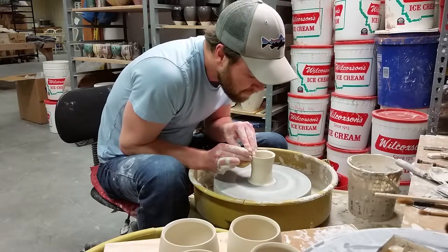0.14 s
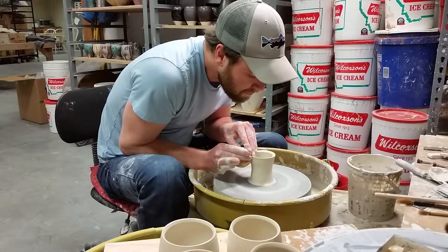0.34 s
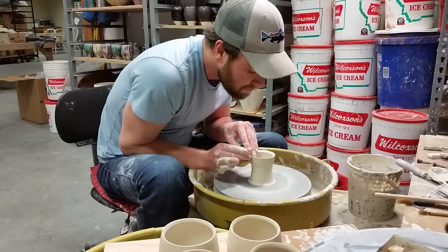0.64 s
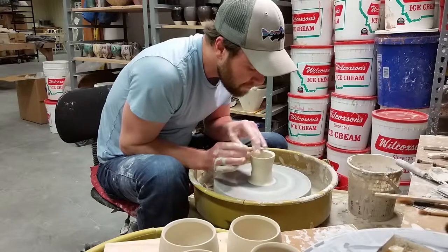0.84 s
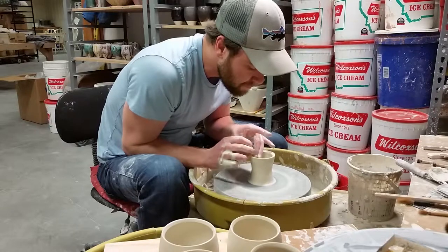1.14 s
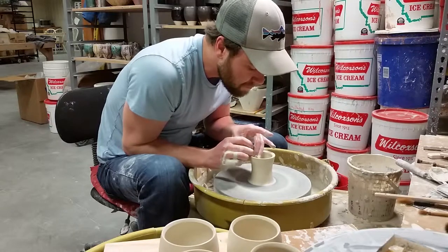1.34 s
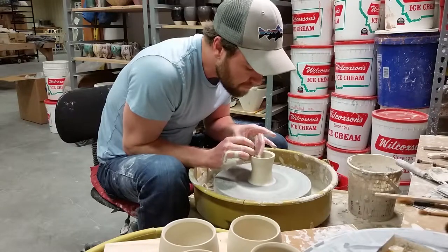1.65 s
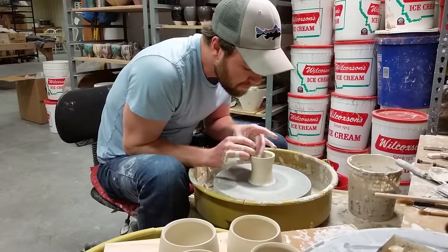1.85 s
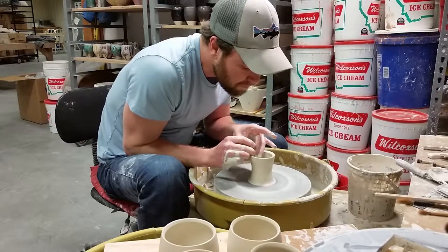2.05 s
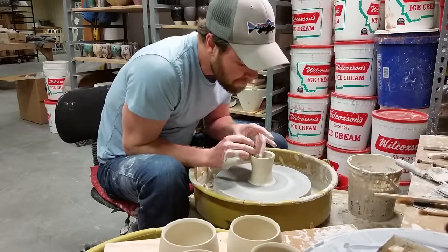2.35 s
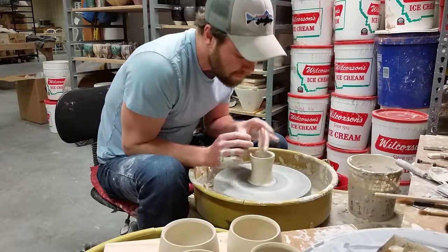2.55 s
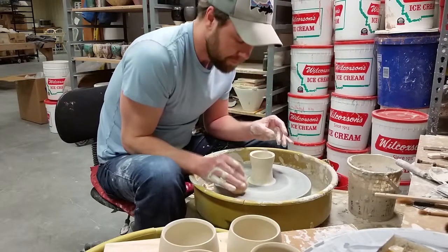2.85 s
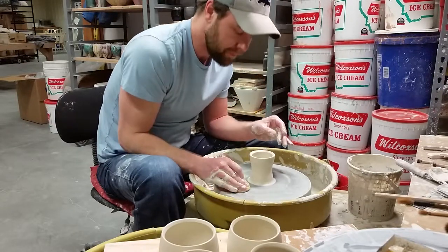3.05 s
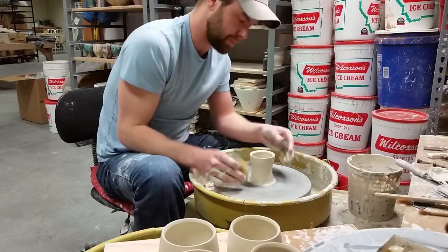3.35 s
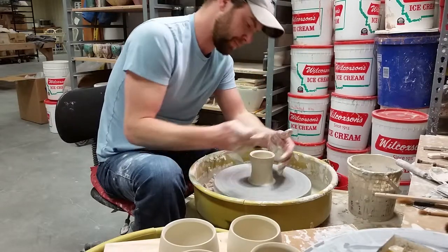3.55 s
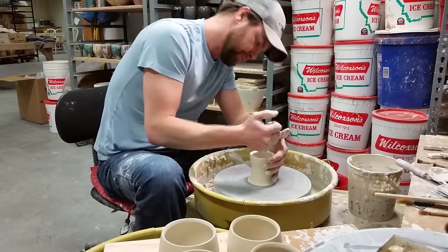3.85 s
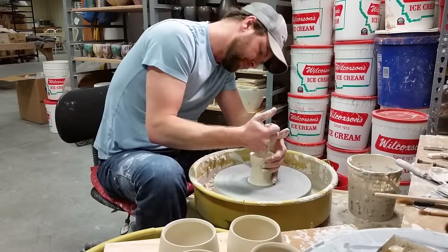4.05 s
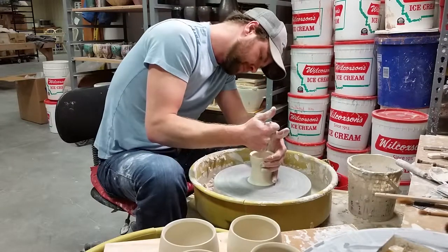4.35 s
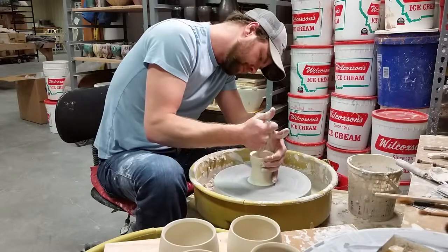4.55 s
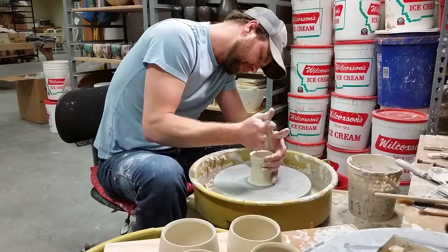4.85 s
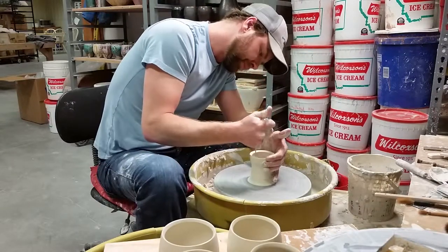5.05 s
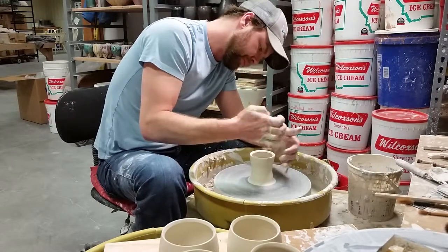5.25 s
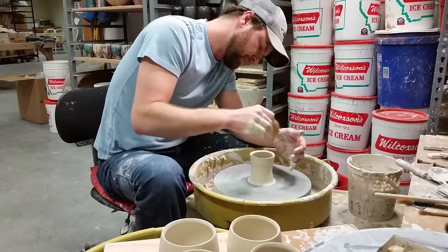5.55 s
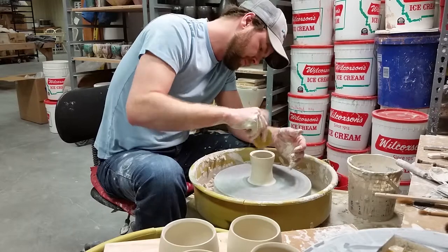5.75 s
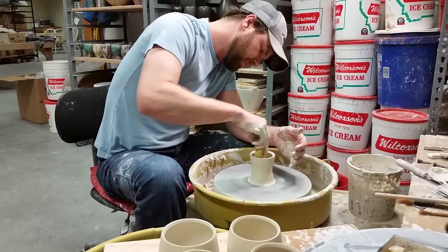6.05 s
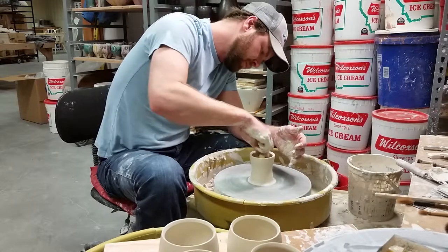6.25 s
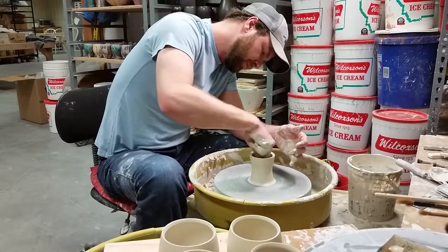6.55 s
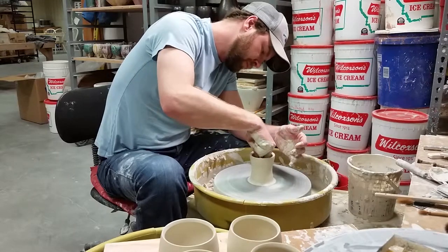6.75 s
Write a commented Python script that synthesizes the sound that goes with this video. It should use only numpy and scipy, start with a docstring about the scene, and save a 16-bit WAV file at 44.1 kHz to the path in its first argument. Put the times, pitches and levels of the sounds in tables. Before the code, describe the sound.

A quiet, close stereo view of an electric potter's wheel running without pause indoors. From 0 to about 3 seconds the motor holds a deep hum around 150 hertz, gently swelling and dipping, with a softer whine near 380 hertz, low frame rumble, rushing air and a thin brush hiss around 2 to 5 kilohertz toward the right. Slow wavering follows the wheel's turning. At about 3.0 to 3.5 wet fingers make faint, grainy slides; a tiny smack comes at 3.8. A thin high singing tone emerges by 3.6. Around 4.1 a dull rub accompanies the hands' load: pitch sags slightly until about 5, the whine fades and partly returns weaker, and the hum breaks into irregular rounded throbs. A small wet smack ticks at 5.2, the airy hiss softens from about 5.5, and a brief dull rub lands at 6.0. Throbbing continues to the end near 6.9.

```python
"""In a pottery studio an electric wheel runs while a small cup is thrown.
The motor hums, whines and sings on multiples of its shaft rate; belt and bearings make the frame rumble.
Filtered noise gives the rushing air and the brushes' hiss to the right. As the hands load the clay the shaft
slows a little and the hum breaks into throbs. Wet fingers are shaped noise: grainy slides, dull rubs
and small smacks. A faint high hiss lies over it all."""
import sys
import numpy as np
from scipy import signal
from scipy.fft import rfft, irfft
from scipy.io import wavfile

SR = 44100
rng = np.random.default_rng(int(sys.argv[2]) if len(sys.argv) > 2 else 0)


def to_wav(sig):
    """Store sig (one row per channel, or 1-D mono) as 16-bit WAV at the path in sys.argv[1].

    Samples outside -1..1 are clipped; the rate is SR.
    """
    pcm = np.clip(np.atleast_2d(sig), -1, 1) * 32767
    pcm = np.round(pcm).astype(np.int16)
    wavfile.write(sys.argv[1], SR, pcm.T)  # frames by channels


N = 304716
TIME = np.arange(N) / SR  # s
BINS = np.maximum(np.arange(N // 2 + 1) * SR / N, 1)  # Hz, kept above zero for the logarithms

# Speed of the motor shaft. Each row: time in seconds, speed in turns per second.
SHAFT_SPEED = [(0, 25.56), (0.4, 25.5), (0.9, 25.55), (1.5, 25.44), (2.2, 25.46), (2.8, 25.38),
               (3.4, 25.47), (3.8, 25.26), (4.1, 25.12), (4.3, 24.88), (4.5, 24.57), (4.8, 24.36),
               (5.2, 24.29), (5.6, 24.3), (6, 24.27), (6.4, 24.29), (6.9, 24.39)]
# The hum's level before its trim and the load's pull. Each row: time in seconds, level in dB.
HUM_CURVE = [(0.0, -48.5), (0.11, -46), (0.49, -53.5), (0.51, -50.5), (1.1, -47), (1.27, -51),
             (1.82, -47.5), (1.93, -55.5), (1.98, -50), (3.48, -46), (4.0, -45.5)]
# Throbs that stand out of the hum under load. Each row: crest in seconds, half length in seconds, level in dB.
HUM_THROBS = [(4.097, 0.067, -46), (4.286, .04, -51.5), (4.418, 0.074, -46.5), (4.586, 0.06, -47),
              (4.841, 0.14, -45.5), (5.142, 0.077, -45.5), (5.323, 0.065, -54), (5.65, 0.06, -47),
              (5.923, 0.14, -45), (6.16, 0.05, -50), (6.414, 0.092, -48), (6.704, 0.073, -45.5),
              (6.89, 0.065, -50.5)]
# Deep partials of the hum. Each row: multiple of the shaft rate, level running free in dB,
# level under load in dB, left over right in dB.
HUM_TONES = [(4, -13, -22.5, -1.5), (6, 1.5, -0.56, -2.5), (7, -13.5, -22.5, 5), (8, -20, -27, 4.5)]
# Partials of the housing's whine. Each row: multiple of the shaft rate, level running free in dB,
# level under load in dB, left over right in dB.
WHINE_TONES = [(11, -13, -24.5, -4), (12, -14.5, -19.5, -0.5), (13, -18, -10.5, -11),
               (14, -8.5, -15.5, -12.5), (15, 2.5, 2, 0), (16, -12, -7, -5.5)]
# Level of the commutator's thin singing. Each row: time in seconds, level in dB.
SINGING_CURVE = [(0, -90), (2.4, -93), (3.6, -77), (6.91, -77.5)]
# Partials of that singing. Each row: multiple of the shaft rate, level running free in dB,
# level under load in dB, left over right in dB.
SINGING_TONES = [(32, -10, -9, -8), (43, -12, -8.5, -2.5), (47, -15.5, -8.5, -8.5), (48, 0.5, -1, -11.5)]
# Resonances of frame and splash pan. Each row: frequency in Hz, width in Hz before narrowing, level in dB.
FRAME_RESONANCES = [(55, 9, -13), (114.4, 10, 0.5), (136.8, 7.7, 2.5), (143.6, 7.2, -1.5), (181, 15, -6),
                    (293, 9.2, -8.5), (337.5, 14, -6.5), (496, 15, -21), (1021, 18, -19)]
# Shared level of brushes, air and high hiss, before their offsets. Each row: time in seconds, level in dB.
NOISE_CURVE = [(0.06, -63), (0.51, -65.5), (0.7, -64), (1.86, -64.5), (3.41, -64), (4.62, -64),
               (4.67, -66.5), (4.92, -64.5), (5.47, -68), (6.0, -68), (6.23, -70), (6.47, -66.5),
               (6.56, -68), (6.85, -66.5)]
# Spectrum of the rushing air. Each row: frequency in Hz, density in dB per Hz.
AIR_SPECTRUM = [(25, -9.5), (60, -3.5), (100, 5), (240, 3), (430, -0.5), (600, -2), (900, -7.5),
                (1150, -10.5), (1400, -17.5), (1800, -22.5), (3000, -21), (6000, -45)]
# Spectrum of the scraping brushes. Each row: frequency in Hz, density in dB per Hz.
BRUSH_SPECTRUM = [(1650, -44), (1900, -16.5), (2150, -6.5), (2380, -9.5), (2680, -30), (2950, -23),
                  (3150, -20), (3500, -2), (4250, 1.5), (4650, -7.5), (5050, -12), (6100, -33), (8000, -42),
                  (11000, -50)]
# Wet fingers sliding on wheel head and clay. Each row: start in seconds, rise in seconds, peak in dB,
# brightness as a corner in Hz.
FINGER_SLIDES = [(2.98, 0.27, -74.5, 18000), (3.23, 0.12, -71, 15000), (3.52, .15, -84.5, 20000),
                 (4.0, 0.2, -81.5, 10000)]
# Spectrum of slip under the fingers. Each row: frequency in Hz, density in dB per Hz.
SLIP_SPECTRUM = [(1200, -4.5), (1800, 5), (2900, -5), (5700, 3.5), (6900, -4.5), (8100, -1.5), (9800, -9.5),
                 (11500, 2.5), (12600, 2), (14000, 1), (16000, -2.5)]
# Hands and sponge pressing on the pot. Each row: crest in seconds, half length in seconds, level in dB.
HAND_RUBS = [(4.145, .3, -68.5), (6.0, 0.048, -66.5)]
# Spectrum of the dull rub. Each row: frequency in Hz, density in dB per Hz.
RUB_SPECTRUM = [(200, -3.5), (600, 0), (1100, -11), (2000, -23.5)]
# Fingers touching or leaving the wet clay. Each row: start in seconds, level in dB, decay in seconds.
FINGER_SMACKS = [(3.805, -77, 0.063), (4.095, -82, .025), (5.219, -71, 0.018), (5.23, -81, 0.11)]
# Spectrum of a smack. Each row: frequency in Hz, density in dB per Hz.
SMACK_SPECTRUM = [(4000, -23), (7000, -17), (10500, -15), (12500, 1), (14200, -1.5), (15500, -10)]
# Spectrum of the faint high hiss. Each row: frequency in Hz, density in dB per Hz.
HIGH_HISS_SPECTRUM = [(3000, -9.5), (7000, -16.5), (9700, -14), (10800, -8), (12200, 1.5), (14000, 0),
                      (16000, 0)]

WHEEL_RATIO = 8.2  # motor turns per turn of the wheel head
FREE_SPEED, FULL_SAG = 25.45, 0.93  # turns per s: unloaded speed, and the slowing that counts as full load
HUM_TRIM_DB, LOAD_SINKS_HUM_DB = -1.43, 7.5
WHINE_FREE_DB, WHINE_LOADED_DB = -55, -62.5
WHINE_FOLLOWS = 0.33  # share of the hum's swing in dB
# the whine fades as the shaft passes through one speed
QUIET_SPEED, QUIET_WIDTH = 24.75, 0.22  # turns per s
QUIET_DEPTH_DB = 16
RUMBLE_DB = -59
BRUSH_DB, LOW_AIR_DB, HIGH_AIR_DB, HIGH_HISS_DB = 0.34, -0.46, -2, -17  # relative to NOISE_CURVE
SLIDE_RELEASE_S = 0.19
LEFT_LAG_S = 0.00025  # the wheel stands a little to the right
CONVERTER_OFFSET = -0.0005
CUTOFF_HZ = 15700


def from_db(db):
    """Decibels to gain."""
    return 10 ** (np.asarray(db) / 20)


def rms_one(x):
    """Scale to unit power."""
    return x / np.sqrt(np.mean(x ** 2) + 1e-20)


def in_time(rows):
    """Each column of a curve at every sample."""
    s, *columns = np.transpose(rows)
    return [np.interp(TIME, s, column) for column in columns]


def colour(points):
    """Gain of a spectrum at every frequency bin, falling steeply past its ends."""
    hz, db = np.transpose(points)
    ends = np.minimum(1, np.minimum(BINS / hz[0], hz[-1] / BINS)) ** 4
    return from_db(np.interp(np.log(BINS), np.log(hz), db)) * ends


def place(pan_db):
    """Left and right gains with a mean of one; a negative pan leans right."""
    gains = from_db([[pan_db / 2], [-pan_db / 2]])
    return gains / gains.mean()


def drift(rate):
    """Slow chance with a spread of one, fading out above the rate in Hz."""
    lowpass = 1 / (1 + (BINS / rate) ** 2) ** 2
    return rms_one(irfft(rfft(rng.standard_normal(N)) * lowpass, N))


def noise(gain, alike, pan_db):
    """Coloured stereo noise, partly shared by the two sides; its middle has unit power."""
    mid, side = irfft(rfft(rng.standard_normal((2, N))) * gain, N)
    shared = np.sqrt(1 + alike) * mid
    apart = np.sqrt(1 - alike) * side * [[1], [-1]]
    pair = (shared + apart) * place(pan_db)
    return pair / pair.mean(axis=0).std()


def partials(table, angle, load, sway_db, flutter_db, scatter):
    """Multiples of the shaft rate; the weak ones sway most with each turn of the wheel head."""
    out = 0
    for multiple, free_db, loaded_db, pan_db in table:
        level_db = free_db + load * (loaded_db - free_db)
        weakness = 1 - from_db(free_db)
        sway = sway_db * weakness * np.sin(angle / WHEEL_RATIO + rng.uniform(0, 2 * np.pi))
        flutter = flutter_db * (0.5 + weakness) * drift(24)
        start_phase = scatter * rng.standard_normal()
        wave = np.sqrt(2) * np.cos(multiple * angle + start_phase)
        out = out + from_db(level_db + sway + flutter) * wave * place(pan_db)
    return out


def motor_tones(angle, speed, load):
    """Hum, whine and singing from one shaft; the whine shares part of the free hum's swells."""
    hum_db, = in_time(HUM_CURVE)
    swing_db = hum_db - hum_db.mean()
    return hum(angle, load, hum_db) + whine(angle, speed, load, swing_db) + singing(angle, load)


def hum(angle, load, hum_db):
    """The frame's deep hum sinks under load, where round throbs stand out of it."""
    steady = from_db(hum_db + HUM_TRIM_DB - LOAD_SINKS_HUM_DB * load)
    throbs = sum(from_db(db) * np.exp(-np.abs((TIME - s) / half) ** 3) for s, half, db in HUM_THROBS)
    tones = partials(HUM_TONES, angle, load, sway_db=1.5, flutter_db=0.65, scatter=1.0)
    return np.hypot(steady, throbs) * tones


def whine(angle, speed, load, swing_db):
    """The housing's whine sinks under load; its partials start nearly in step and purr once per shaft turn."""
    quiet = np.exp(-((speed - QUIET_SPEED) / QUIET_WIDTH) ** 4)
    level_db = WHINE_FREE_DB + load ** 2 * (WHINE_LOADED_DB - WHINE_FREE_DB)
    level_db = level_db - QUIET_DEPTH_DB * quiet + WHINE_FOLLOWS * swing_db
    tones = partials(WHINE_TONES, angle, load, sway_db=1.3, flutter_db=0.9, scatter=0.12)
    return from_db(level_db) * tones


def singing(angle, load):
    """The commutator's thin tones waver slightly because chance nudges the shaft angle they follow."""
    level_db, = in_time(SINGING_CURVE)
    waver = 0.0063 * drift(11)  # radians of shaft angle
    tones = partials(SINGING_TONES, angle + waver, load, sway_db=1.5, flutter_db=2.5, scatter=1.0)
    return from_db(level_db) * tones


def frame_rumble(angle):
    """Belt and bearings shake the frame's modes, harder once per turn of the wheel head."""
    power = 0
    for hz, width, db in FRAME_RESONANCES:
        detune = (BINS - hz) / (0.73 * width)  # each mode rings narrower than its listed width
        power = power + from_db(2 * db) / (1 + detune ** 2) ** 2
    level_db = RUMBLE_DB + 2.0 * np.sin(angle / WHEEL_RATIO)
    return from_db(level_db) * noise(np.sqrt(power), alike=0.89, pan_db=-2.5)


def air_and_brushes(angle, noise_db):
    """Air rushes through the motor; the brushes scrape, a little harder once per shaft turn."""
    deep = 1 / (1 + (BINS / 380) ** 4)  # long waves reach both sides more alike
    air = colour(AIR_SPECTRUM)
    low_air = from_db(noise_db + LOW_AIR_DB) * noise(air * np.sqrt(deep), alike=0.29, pan_db=-9.5)
    high_air = from_db(noise_db + HIGH_AIR_DB) * noise(air * np.sqrt(1 - deep), alike=0.089, pan_db=-5.5)
    scrape_db = noise_db + BRUSH_DB + 0.14 * np.cos(angle) + 0.51 * drift(40)
    brushes = from_db(scrape_db) * noise(colour(BRUSH_SPECTRUM), alike=0.02, pan_db=-21.0)
    return low_air + high_air + brushes


def wet_hands():
    """All that the hands do on the wet clay: slides, rubs and smacks."""
    return finger_slides() + hand_rubs() + finger_smacks()


def finger_slides():
    """Slip under the fingers hisses; fast chance in its level makes it grainy."""
    slides = 0
    for s, rise, db, corner_hz in FINGER_SLIDES:
        age = np.maximum(TIME - s, 0)
        release = np.exp(-np.maximum(age - rise, 0) / SLIDE_RELEASE_S)
        stroke = np.sqrt(np.minimum(age / rise, 1)) * release
        dulling = 1 / np.sqrt(1 + (BINS / corner_hz) ** 6)
        slip = noise(colour(SLIP_SPECTRUM) * dulling, alike=0.04, pan_db=-4.5)
        slides = slides + from_db(db + 1.85 * drift(120)) * stroke * slip
    return slides


def hand_rubs():
    """Pressing on the pot swells and fades as a dull, rounded burst of low noise."""
    press = sum(from_db(db) * np.exp(-((TIME - s) / half) ** 2) for s, half, db in HAND_RUBS)
    return press * noise(colour(RUB_SPECTRUM), alike=0.3, pan_db=-5)


def finger_smacks():
    """Fingers meeting or leaving wet clay give a bright burst that starts fast and dies away."""
    burst = 0
    for s, db, decay in FINGER_SMACKS:
        age = np.maximum(TIME - s, 0)
        attack = np.minimum(age / 0.004, 1)
        burst = burst + from_db(db) * attack * np.exp(-age / decay)
    return burst * noise(colour(SMACK_SPECTRUM), alike=0.05, pan_db=3)


def high_hiss(noise_db):
    """A faint wide hiss of treble noise follows the level of the brushes."""
    hiss = noise(colour(HIGH_HISS_SPECTRUM), alike=0.02, pan_db=3.5)
    return from_db(noise_db + HIGH_HISS_DB) * hiss


def scene():
    """One shaft drives the wheel's tones and pulses; the wheel reaches the left side a moment later."""
    speed, = in_time(SHAFT_SPEED)
    noise_db, = in_time(NOISE_CURVE)
    angle = 2 * np.pi * np.cumsum(speed) / SR
    load = np.clip((FREE_SPEED - speed) / FULL_SAG, 0, 1)  # the hands' load, read from the slowing
    left, right = motor_tones(angle, speed, load) + frame_rumble(angle) + air_and_brushes(angle, noise_db)
    late_left = np.interp(TIME - LEFT_LAG_S, TIME, left)
    wheel = np.array([late_left, right])
    return wheel + wet_hands() + high_hiss(noise_db)


def record(dry):
    """Soft ends, the converter's small offset, and a steeply cut top."""
    ends = np.minimum(1, np.minimum(TIME, TIME[-1] - TIME) / 0.004)
    top_cut = signal.ellip(12, 0.1, 80, CUTOFF_HZ, fs=SR, output="sos")
    return signal.sosfilt(top_cut, ends * (dry + CONVERTER_OFFSET))


dry = scene()
out = record(dry)
to_wav(out)
```